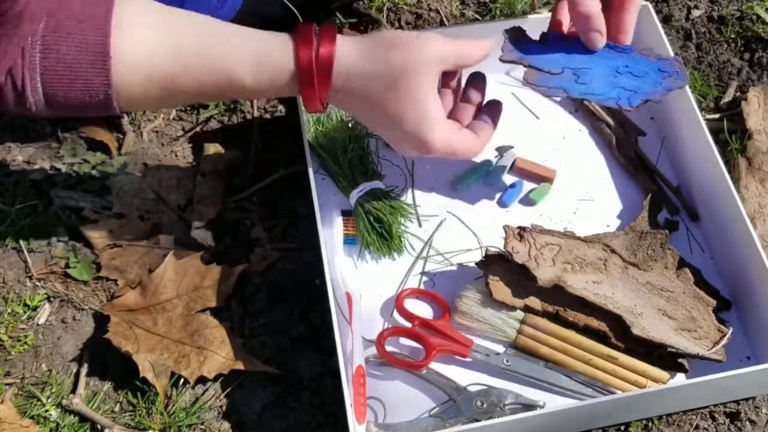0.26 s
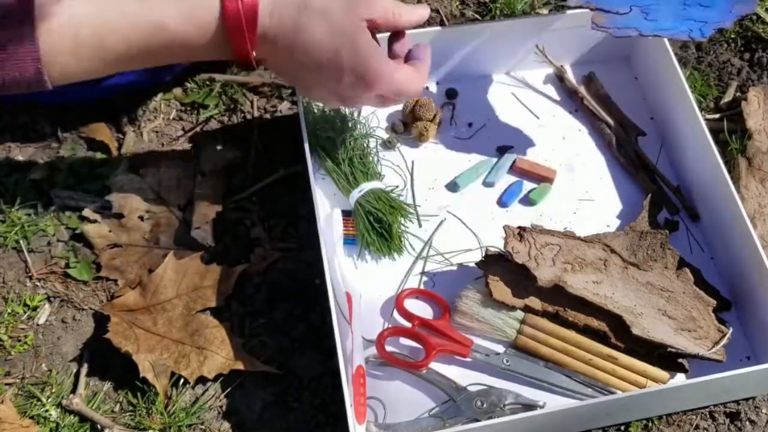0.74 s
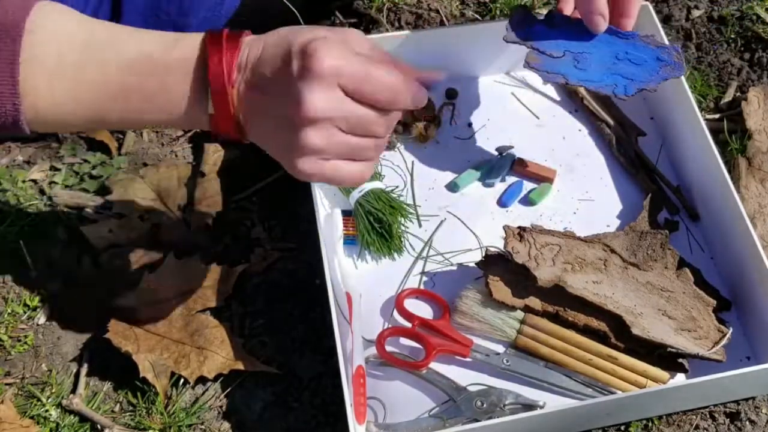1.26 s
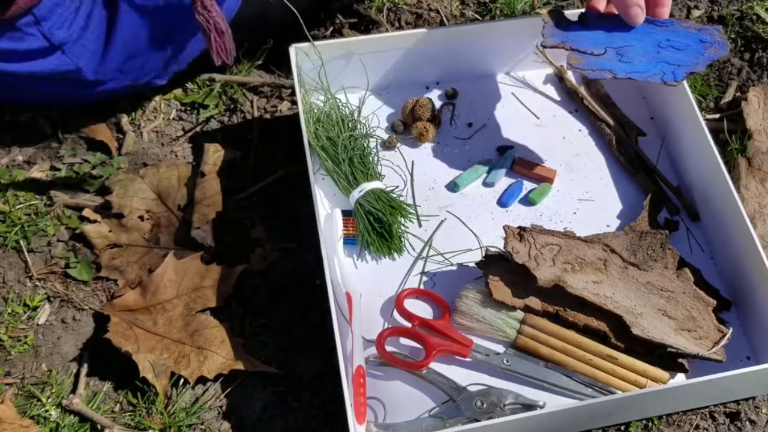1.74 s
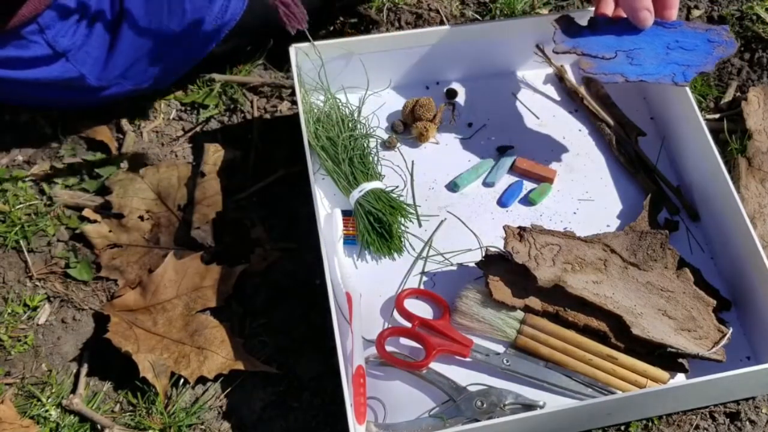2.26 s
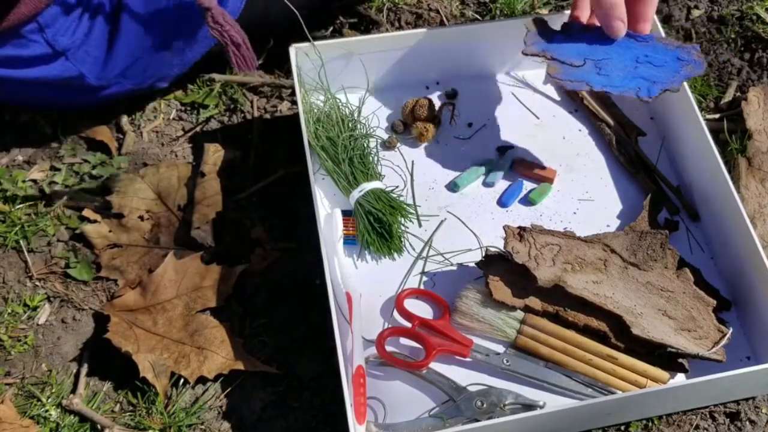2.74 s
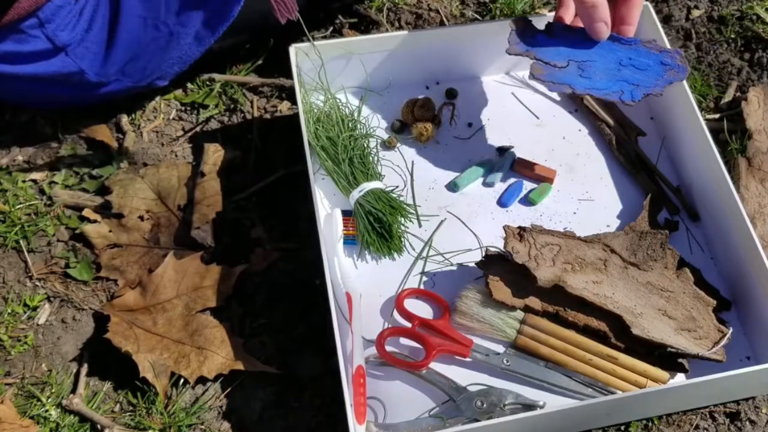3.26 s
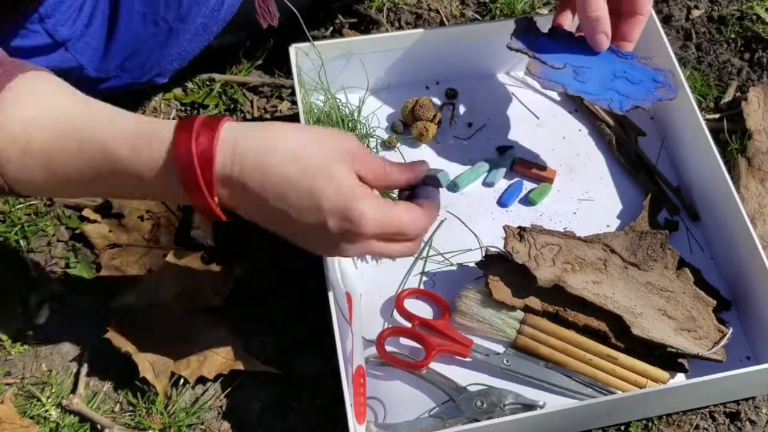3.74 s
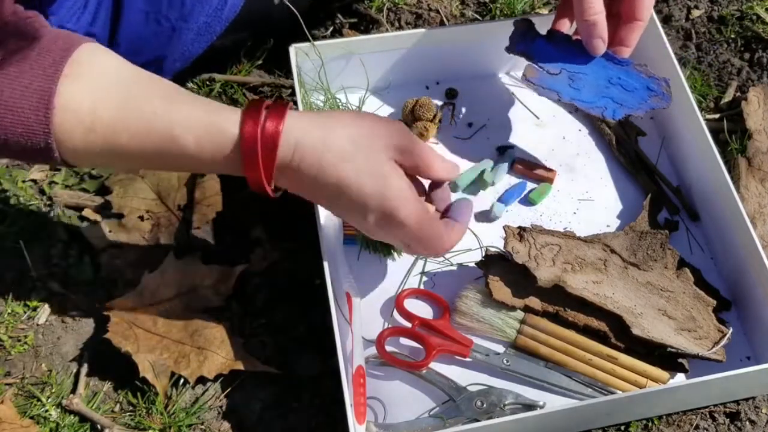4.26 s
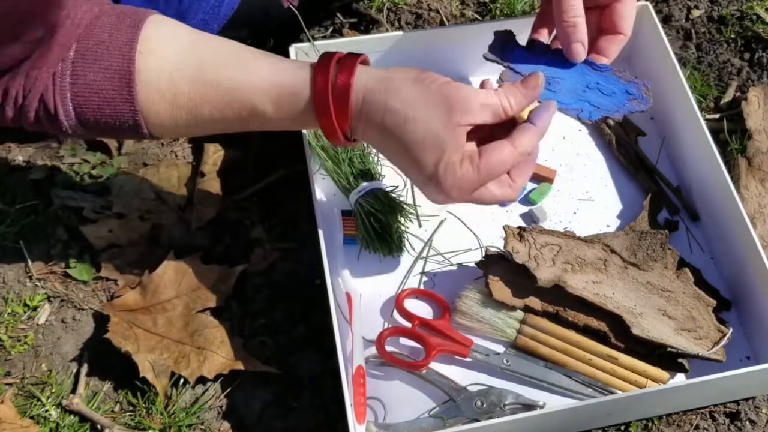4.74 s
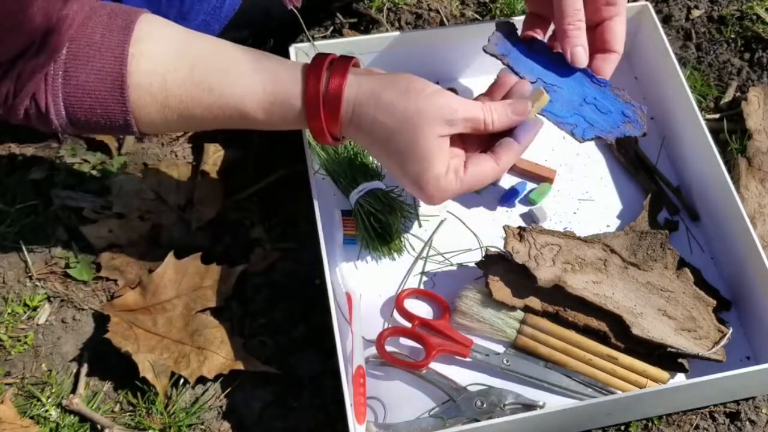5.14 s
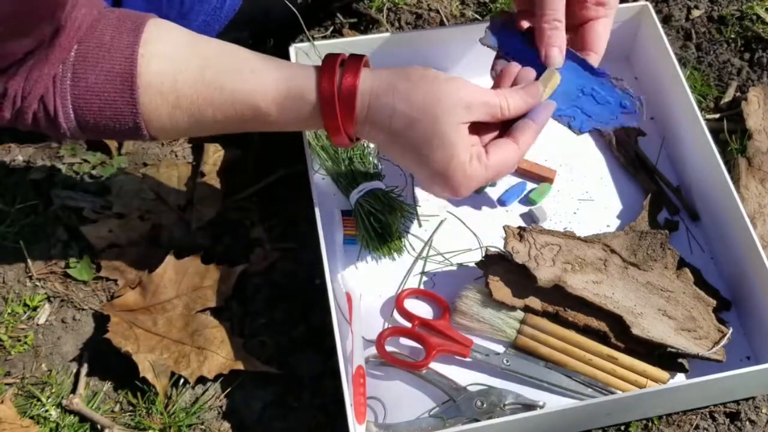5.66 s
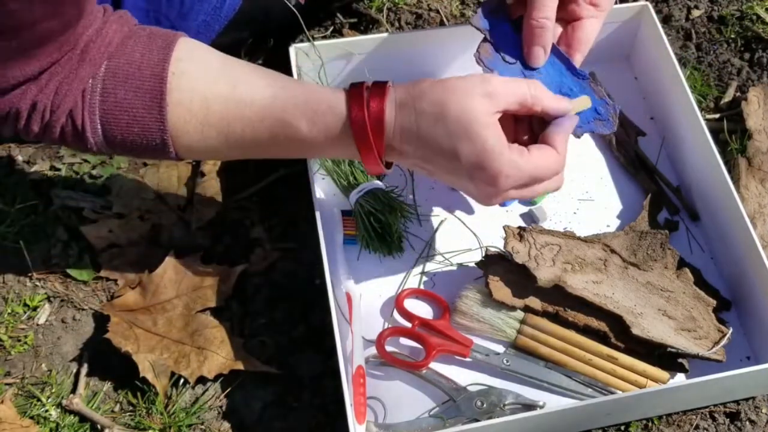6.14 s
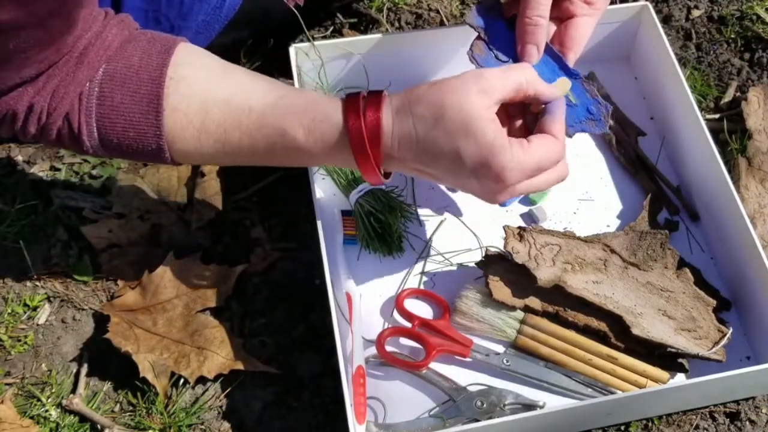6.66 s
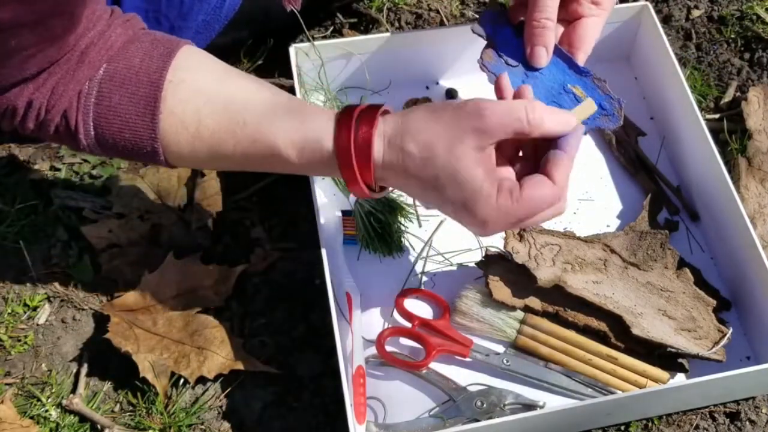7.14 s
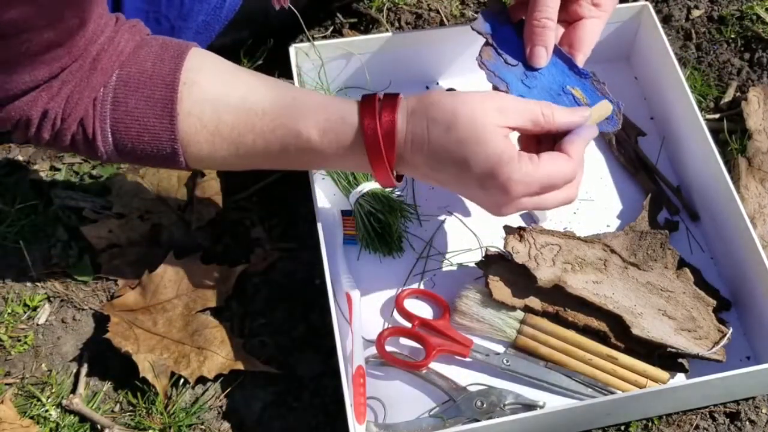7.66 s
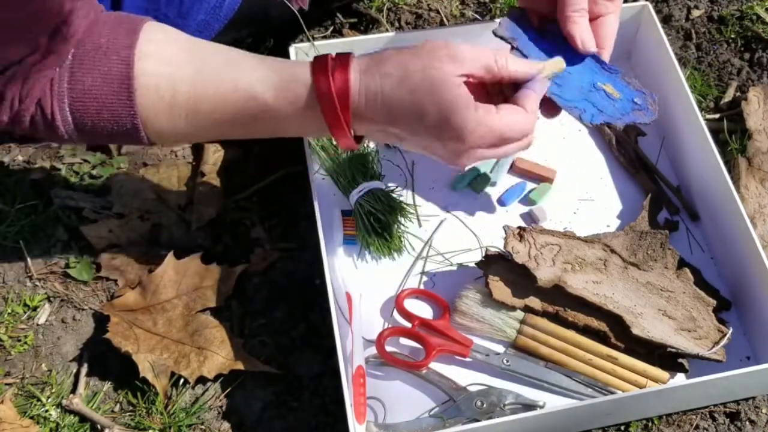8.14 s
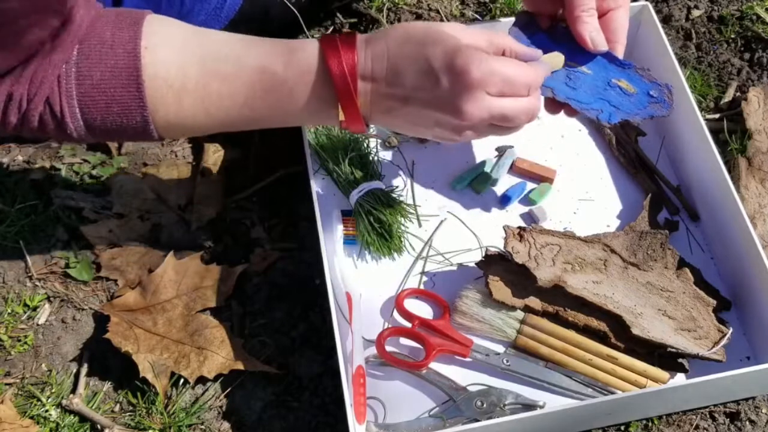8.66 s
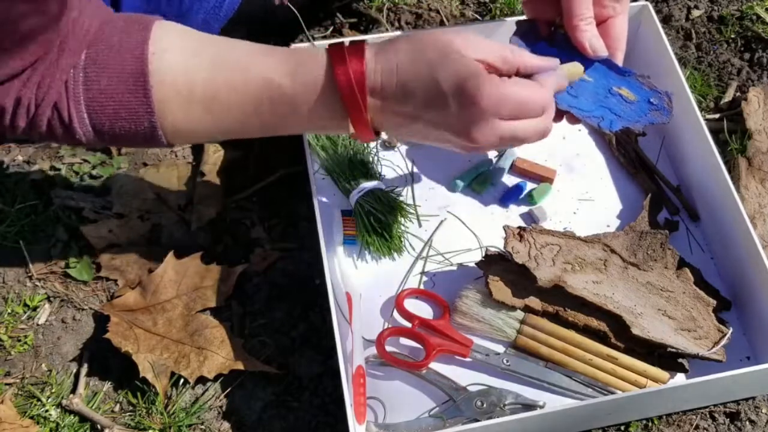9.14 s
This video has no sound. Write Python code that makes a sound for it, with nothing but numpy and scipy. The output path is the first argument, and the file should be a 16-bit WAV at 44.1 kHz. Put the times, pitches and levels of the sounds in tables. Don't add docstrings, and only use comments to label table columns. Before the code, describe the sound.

Very close stereo outdoors, leaning left. Two quick bright brushes over bark and a sharp flick with snapping flakes, then soft sleeve swishes. Bark crumbles with dry cracks and hollow knocks, then is shaken. Thin sticks clatter loudly into a card box and a thicker one drops. Later only faint chalk rubs, small bird notes and a short squeak, over distant traffic rumble and light hiss.

```python
import sys
import numpy as np
from scipy import signal
from scipy.fft import rfft, irfft
from scipy.io import wavfile
from scipy.ndimage import uniform_filter1d

SR = 44100
rng = np.random.default_rng(int(sys.argv[2]) if len(sys.argv) > 2 else 0)


def log_audio(samples):
    frames = np.atleast_2d(samples).T
    limited = np.clip(frames, -1, 1)
    pcm = np.round(limited * 32767).astype(np.int16)
    wavfile.write(sys.argv[1], SR, pcm)


def magnitude_from_level(level_db):
    exponent = np.asarray(level_db, float) / 20
    return 10 ** exponent


N = 414099

# (frequency [Hz], level per Hz [dB])
RUMBLE_COLOUR = [(24, -45), (40, -12.5), (59, -6.5), (134, -6), (193, -4), (221, -13), (262, -10),
                 (287, -26.5), (600, -44.5), (780, -62), (1320, -120)]
HISS_COLOUR = [(180, -32), (300, -7), (519, -19.5), (812, -19.5), (1090, -24), (1770, -23.5), (2860, -25),
               (4480, -23.5), (9610, -30.5), (15800, -40)]
# (frequency [Hz], likeness [0-1])
AIR_LIKENESS = [(60, 0.99), (240, .85), (500, 0.83), (950, 0.061), (15000, .02)]
# (frequency [Hz], left over right [dB])
AIR_BALANCE = [(60, 1.2), (950, 1.8), (15000, 0.55)]
# (time
# [s], level [dB])
TRAFFIC = [(0, -35.5), (.25, -37), (.4, -38.5), (1.4, -40.5), (2.4, -44.5), (4.1, -42), (4.2, -53),
           (4.35, -48), (5.0, -44.5), (5.65, -43), (7.8, -43), (9.39, -41.5)]
# (time [s], lift [dB])
RUSTLE = [
    (.2, 4.8),
    (2.08, 7.1),
    (3.25, 4.1),
]
# (time [s], level [dB])
DRONE = [(0, -33), (.4, -45), (1.5, -44.5), (1.8, -58.5), (3.2, -57), (3.899, -47), (4.2, -52),
         (9.39, -53.5)]

# (touch [s], peak [s], lift [s], peak level [dB], level at lift [dB])
BRUSH = [
    (0, .002, .034, -22.5, -35.5),
    (0.079, 0.168, 0.212, -17.5, -25),
]
FLICK = [
    (0.52, 0.566, .593, -24, -24.5),
]
CRUMBLE = [
    (1.817, 1.842, 1.864, -30, -29),
    (1.854, 1.96, 2.038, -27, -31.5),
    (2.04, 2.057, 2.088, -41.5, -47),
]
SHAKE = [
    (3.206, 3.224, 3.35, -52.5, -52.5),
    (3.269, 3.283, 3.291, -33, -37),
]
RATTLE = [
    (1.8, 1.844, 1.87, -30, -39.5),
    (1.871, 2.0, 2.13, -36, -50),
    (2.04, 2.054, 2.33, -48, -68),
    (3.133, 3.291, 3.45, -39.5, -55),
]
CHALK = [
    (1.7, 1.726, 1.765, -47, -53.5),
    (5.603, 5.637, 5.655, -58.5, -58),
    (9.332, 9.401, 9.4, -55.5, -51),
]
HARD_CHALK = [
    (2.945, 2.98, 2.995, -52.5, -57),
    (8.772, 8.805, 8.845, -39.5, -37),
]
DRAG = (8.38, 8.485, 8.59, -56, -66)

# (frequency [Hz], level [dB])
BRUSH_COLOUR = [(350, -69), (600, -33.5), (1070, -24.5), (1560, -35), (1840, -19), (2740, -10.5),
                (3280, -10), (3560, -9), (4250, -9), (7450, -5), (15800, -17.5)]
FLICK_COLOUR = [(600, -26), (1500, -25), (2100, -17.5), (2750, -24), (3400, -5.5), (5000, -9.5),
                (8000, -7.5), (15800, -14.5)]
CRUMBLE_COLOUR = [(700, -9.5), (1200, -1.5), (2000, -5.5), (3500, -4), (5000, -6), (8000, -12.5),
                  (15800, -21.5)]
SHAKE_COLOUR = [(710, -30), (1200, -6.5), (2010, -16), (3030, -24), (3380, -13.5), (4800, -12), (6740, -4),
                (10600, -8), (15800, -19.5)]
RATTLE_COLOUR = [(200, -38.5), (380, -7), (650, -5), (900, -8), (1400, -19.5), (2500, -27.5), (16000, -50)]
CHALK_COLOUR = [(1500, -21), (3300, -23.5), (8000, -18), (8800, -22.5), (13500, -18.5), (14500, -34),
                (16000, -40)]
RUB_COLOUR = [(800, -17), (2500, -2.5), (4000, -6.5), (5700, -8.5), (8000, -3), (12000, -19.5)]
SLEEVE_COLOUR = [(2940, -32), (5000, -35), (6640, -22), (7420, -13.5), (9000, -11.5), (11200, -1.5),
                 (12100, -3.5), (15800, 0)]
# (frequency [Hz], width [Hz], level [dB])
BRUSH_MODES = [(2170, 96, 1.9), (3600, 1200, 3.6), (5140, 440, 2)]
FLICK_MODES = [(2150, 350, 0), (3600, 540, 4), (5250, 279, 6), (6470, 230, -0.5), (8600, 1200, -0.5)]
CHALK_MODES = [(5177, 510, 16.5), (7160, 790, 14.5), (12270, 1500, 2)]
HARD_MODES = [(3900, 600, 28), (5650, 950, 34), (6950, 800, 28), (9400, 500, 12), (11900, 1800, 8)]
DRAG_MODES = [(3650, 300, 8), (5100, 500, 21), (6500, 600, 15)]
RUB_MODES = [(3880, 390, 4.5), (5700, 400, 3)]
# (frequency [Hz], left over right [dB])
BRUSH_SHADE = [(900, 6), (2200, 12), (3300, 1), (8000, 2), (13000, 4)]
CRUMBLE_SHADE = [(1000, 12), (2200, 13), (4000, 12), (6000, 16), (13000, 15)]
SHAKE_SHADE = [(1000, 16), (2500, 26), (5500, 32), (8000, 11), (13000, 15)]
HARD_SHADE = [(2200, 4), (3900, 27), (5500, 14), (8000, 13), (13000, 23)]
SLEEVE_SHADE = [(7000, 18), (9000, 10), (12000, 21)]
BOX_SHADE = [(1500, 9), (2500, 15), (3700, 13), (6000, 11), (8500, 7)]

# (time [s], level [dB])
SNAGS = [(1.841, -20.5), (1.85, -22), (1.861, -22), (1.887, -29), (1.91, -27.5), (1.921, -27.5),
         (1.945, -22.5), (1.965, -21.5), (1.996, -21.5), (2.026, -23.5), (2.036, -23.5), (3.251, -31.5)]
# (time [s], level [dB])
SLIPS = [(8.789, -39), (8.797, -32), (8.802, -44), (8.805, -28), (8.812, -27.5), (8.812, -27), (8.816, -24),
         (8.826, -29), (8.831, -33), (8.840, -38.5)]
# (time [s], peak level [dB], frequency [Hz], 60 dB decay [s])
FLAKES = [(0.5508, -8, 3620, .025), (0.5563, 0, 3600, 0.025), (.556, -23.5, 2150, 0.042),
          (.084, -39.5, 8600, 0.05), (.093, -30.5, 7500, .03), (.109, -33.5, 2060, 0.072),
          (.558, -21, 9700, 0.028), (1.056, -37, 7080, 0.046), (0.559, -16, 5250, .02),
          (.558, -17, 6670, 0.024), (.571, -15, 3600, 0.028), (1.823, -27.5, 3550, 0.034),
          (1.824, -25, 5100, .03), (1.826, -31, 6490, 0.028), (1.837, -19, 3500, 0.034),
          (1.84, -21.5, 7800, .02), (3.183, -49, 7750, 0.016), (3.198, -31, 7350, 0.013),
          (3.212, -25, 8600, .012), (3.213, -36, 5740, 0.013), (3.219, -24, 7280, .012),
          (3.2256, -6.5, 7260, 0.005), (3.244, -18, 7700, .012), (3.249, -23.5, 5800, 0.0084),
          (3.319, -21, 4653, 0.0095), (8.786, -37.5, 7070, 0.041), (8.83, -34.5, 6850, 0.047),
          (8.838, -28, 6950, 0.052)]
CRACKS = [(1.8595, -14.5, 2290, 0.0026), (1.8599, -3.5, 940, 0.008), (1.9095, -22, 3394, .004),
          (1.9205, -20, 4700, .004), (1.9455, -18, 2600, .004), (1.9645, -11, 2190, .004),
          (1.9655, -18, 8480, .005), (1.995, -23.5, 3010, .004), (2.0256, -17, 2780, .004),
          (2.0368, -14.5, 3150, 0.0027), (2.066, -20.5, 2190, 0.006), (2.085, -30, 4500, .004),
          (3.2258, -17, 4160, 0.0013), (3.251, -22, 1796, 0.0044), (3.2876, -9.5, 1950, 0.0036)]
RINGS = [(4.118, -17, 3090, 0.021), (4.125, -14.5, 2990, .02), (4.1325, -8, 2300, 0.028),
         (4.1325, -10, 5160, .02), (4.133, -15, 7400, 0.021), (4.252, -24, 2280, 0.026),
         (4.251, -24, 3670, .025), (4.259, -32.5, 5170, 0.022), (4.26, -24, 3500, 0.018),
         (4.166, -24, 2960, 0.017), (4.265, -50.5, 5230, .2), (4.132, -12, 4400, 0.023),
         (4.4882, -21, 3095, 0.02), (4.4896, -36.5, 3880, 0.019), (4.506, -41, 3160, .04),
         (4.517, -49, 3240, 0.047), (4.599, -54, 3700, 0.029)]
# (time [s], level [dB], frequency [Hz], width [Hz], 60 dB decay [s])
FAR_KNOCKS = [
    (.72, -47.5, 906, 500, 0.59),
    (2.895, -46, 1930, 250, 0.17),
    (2.905, -48, 2250, 450, 0.91),
    (2.91, -52.5, 3540, 500, 0.75),
    (3.64, -50.5, 2427, 600, 0.11),
]
# (time [s], level [dB])
RUBS = [(6.15, -62.5), (6.25, -70), (6.345, -59), (6.44, -66), (6.529, -60), (6.65, -58), (6.745, -57),
        (6.86, -54.5), (6.99, -60), (0.749, -54.5)]
# (time [s], level [dB], relative length)
SLEEVE = [(.9, -65, 0.72), (1.029, -74, 0.68), (1.061, -73.5, .9), (1.143, -80, 0.7), (1.213, -64, 0.7),
          (1.44, -79, 1.4), (4.468, -84, 0.4)]
# (time [s], peak level [dB], frequency
# [Hz])
KNOCKS = [(1.789, -20.5, 750), (1.825, -15, 800), (1.842, -13.5, 840), (1.859, -15.5, 387),
          (1.887, -29, 684), (1.914, -19.5, 810), (1.945, -23, 660), (1.964, -11, 1120),
          (1.992, -15.5, 730), (2.025, -11.5, 680), (2.035, -17, 710), (2.066, -13.5, 846),
          (2.083, -23.5, 664), (2.153, -23, 595), (2.175, -30, 830), (2.24, -39, 850), (2.289, -43.5, 963),
          (2.969, -41.5, 791), (3.151, -22, 683), (3.198, -32, 720), (3.225, -18, 610), (3.249, -15.5, 700),
          (3.263, -12.5, 590), (3.271, -12.5, 570), (3.283, -15, 653), (3.291, -16.5, 583),
          (3.328, -18, 656), (3.346, -16.5, 595), (3.391, -28, 705), (3.407, -26.5, 642),
          (2.138, -36.5, 526), (3.208, -28, 676), (3.235, -28, 600), (3.255, -31, 518), (3.308, -27.5, 692),
          (3.338, -25, 695), (1.832, -18.5, 720), (1.848, -17.5, 806), (1.845, -23.5, 1510),
          (1.85, -24, 1600), (1.937, -27.5, 750), (1.948, -25, 990), (1.966, -17.5, 590), (1.977, -26, 754),
          (1.985, -29.5, 670), (1.997, -19.5, 520), (2.008, -24, 800), (2.016, -23, 695),
          (2.03, -18.5, 464), (2.07, -19, 880), (2.139, -42, 1500), (2.241, -42, 1400), (2.289, -43, 1336),
          (2.331, -50, 895)]
# (time [s], peak level [dB], frequency [Hz], tick level [dB])
THUMP = (2.158, -26, 110, -80)
# (time [s], peak level
# [dB], brightness [dB], strongest frequency [Hz])
TAPS = [(1.86, -17, -18.5, 1120), (2.153, -25.5, -38, 1630), (4.112, -36, -7, 2300), (4.115, -26, -6, 2280),
        (4.119, -9.5, 1, 1450), (4.124, -6, -7.5, 1000), (4.132, -2, 2, 3600), (4.133, -4, -5.5, 2290),
        (4.137, -8, -2, 3600), (4.139, -9.5, -11.5, 934), (4.167, -20, -7, 956),
        (4.1673, -25.5, -8.5, 3030), (4.178, -20.5, -20.5, 1020), (4.194, -27, -31, 1140),
        (4.208, -29, -16, 873), (4.252, -12.5, -16.5, 1090), (4.2516, -29, -14.5, 2310),
        (4.26, -16.5, -21.5, 3320), (4.261, -31.5, -11, 5180), (4.37, -49, -26, 912),
        (4.408, -40.5, -19, 1084), (4.598, -48, -12, 1037), (7.019, -51.5, 4, 5530),
        (8.006, -47, -8.5, 1307), (8.006, -45, 0, 3570), (8.29, -47, -8, 993), (9.256, -45, -3.5, 1080)]
DROPS = [
    (4.489, -14.5, -16, 1460),
    (4.506, -31.5, -19, 1450),
    (4.522, -34.5, -24, 1400),
]
# (frequency [Hz], level [dB])
BOX_MODES = [(790, -4.5), (1000, -5), (1290, -5), (1560, -10), (1830, -1), (2290, 1), (3030, 1.5),
             (3200, -3.5), (3600, 2), (4300, -2), (5200, -2.5)]
STICK_MODES = [(620, 0.5), (1250, -3.5), (1500, 0), (1795, -3), (2150, -1), (3060, 2), (3250, -2),
               (3850, -5), (4900, -9)]
# (start [s], length [s], from [Hz], to [Hz], level [dB])
PEEPS = [
    (7.874, 0.039, 10980, 11380, -51.5),
    (7.944, 0.027, 4520, 4600, -61),
    (7.956, 0.14, 4603, 5250, -42),
    (8.058, 0.06, 6430, 8050, -43.5),
    (8.183, .022, 7180, 7230, -49.5),
    (8.202, 0.049, 8090, 8140, -47.5),
]
RASPS = [
    (5.622, 0.11, 6950, 6790, -49.5),
    (5.664, 0.046, 7700, 7670, -62),
    (5.713, 0.069, 7540, 7140, -46.5),
    (5.729, 0.045, 6530, 6400, -54),
]

HISS_DB, HISS_FOLLOWS, USUAL_DB, RUSTLE_S = -59.5, 0.75, -43, 0.19
DRONE_HZ, DRONE_WIDTH_HZ = 136.23, 10
LEAN_IN_DB, LIFT_DB, LIFT_S, TRAIL_DB_PER_S, TRAIL_S = 36, 5.5, 0.0028, 427, 0.07
TRAIL_DULL, LEAN_BRIGHT = 0.36, 0.1
SNAG_DB_PER_S, SLIP_DB_PER_S, SNAG_DULL = 4001, 6000, 0.5
SWISH_IN_S, SWISH_OUT_S, SWISH_DB = 0.047, 0.11, 21
RUB_S = 0.047
TICK_OVER_GRIT_DB, SOFT_TICK_DB = 3.5, -54.5
RING_S, RING_SLOPE, PAN_DB, PAN_DB_PER_OCTAVE = 0.03, -0.14, 6.5, 4.5
NOTE_ATTACK, NOTE_START_DB, NOTE_FADE_DB, FADE_SHAPE, CLIMB_HOLD, BEND = 0.11, -5, -27, 0.37, 0.26, 1.2


def evened(x):
    return x / np.sqrt(np.mean(x ** 2) + 1e-20)


def read(points, hz):
    f, value = np.transpose(points)
    return np.interp(np.log(hz + 1), np.log(f + 1), value)


def add(mix, s, sound):
    part = mix[:, max(round(s * SR), 0):][:, :sound.shape[1]]
    part += sound[:, :part.shape[1]]


def ports(near, other, pan_db, same, delay):
    same = np.clip(same, 0, 1)
    right = same * np.roll(near, delay) + np.sqrt(1 - same ** 2) * other
    return np.array([near * magnitude_from_level(pan_db / 2), right * magnitude_from_level(-pan_db / 2)])


def shade(pair, balance):
    balance_db = read(balance, np.fft.rfftfreq(pair.shape[1], 1 / SR))
    return irfft(rfft(pair) * magnitude_from_level(balance_db * np.array([[0.5], [-0.5]])), pair.shape[1])


def resonate(x, hz, width):
    turn = np.exp(2j * np.pi * np.cumsum(hz * np.ones(x.shape[-1])) / SR)
    r = np.exp(-np.pi * width / SR)
    return 2 * (turn * signal.lfilter([1 - r], [1, -r], x / turn + 1e-18)).real


def air():
    frames, hz, t = N // 256 + 5, np.fft.rfftfreq(1024, 1 / SR), np.arange(N) / SR
    same = np.clip(read(AIR_LIKENESS, hz), -1, 1)[:, None]
    balance_db = read(AIR_BALANCE, hz)[:, None] * np.array([0.5, -0.5])[:, None, None]
    rumble_db = np.interp(t, *np.transpose(TRAFFIC))
    rustle_db = sum(db * np.exp(-((t - s) / RUSTLE_S) ** 2) for s, db in RUSTLE)
    hiss_db = HISS_DB + HISS_FOLLOWS * (rumble_db - USUAL_DB) + rustle_db
    out = 0
    for colour, level_db, patchy_db in ((RUMBLE_COLOUR, rumble_db, 1.2), (HISS_COLOUR, hiss_db, 0.8)):
        a, b, c, d, patches = rng.standard_normal((frames, 513, 5)).T
        patches = uniform_filter1d(uniform_filter1d(patches, size=14, axis=0), size=12, axis=1)
        left = a + 1j * b
        z = np.array([left, same * left + np.sqrt(1 - same ** 2) * (c + 1j * d)])
        z *= magnitude_from_level(read(colour, hz)[:, None] + patchy_db * evened(patches) + balance_db)
        out = out + evened(signal.istft(z, nperseg=1024, noverlap=768)[1][:, :N]) * magnitude_from_level(level_db)
    return np.array([out[0], np.roll(out[1], 17)])


def drone():
    hum = resonate(rng.standard_normal(N), DRONE_HZ, DRONE_WIDTH_HZ)
    hum = evened(resonate(hum, DRONE_HZ, DRONE_WIDTH_HZ))
    return hum * magnitude_from_level(np.interp(np.arange(N) / SR, *np.transpose(DRONE)))


def grit(size, colour, modes, coarse_db, split_hz=8000):
    sizes = np.minimum(rng.exponential(1, (size + 1024, 1)), 4)
    grains = rng.standard_normal((size + 1024, 2)) * magnitude_from_level(coarse_db * sizes)
    hz = np.fft.rfftfreq(size + 1024, 1 / SR)
    peaks = sum(magnitude_from_level(db) / (1 + (2 * (hz - f) / w) ** 2) ** 2 for f, w, db in modes)
    spectrum = rfft(grains.T) * magnitude_from_level(read(colour, hz)) * (1 + peaks)
    bright = np.clip((hz - split_hz) / 1000 + 0.5, 0, 1)
    return [evened(irfft(spectrum * part, size + 1024)[:, :size]) for part in (1 - bright, bright)]


def gesture(touch, peak, lift, peak_db, lift_db, bright_db, tilt=0, snags=(), lean_db=LEAN_IN_DB,
            drop_db=LIFT_DB, dulls=TRAIL_DULL, airy=LEAN_BRIGHT, snag_db_per_s=SNAG_DB_PER_S):
    s = np.arange(touch, lift + TRAIL_S, 0.0005)
    lean = lean_db * np.clip((peak - s) / (peak - touch), 0, 1) ** 2
    trail = drop_db * np.clip((s - lift) / LIFT_S, 0, 1) + TRAIL_DB_PER_S * np.maximum(s - lift, 0)
    even = np.interp(s, [peak, lift], [peak_db, lift_db]) - lean - trail
    catches = [db - snag_db_per_s * abs(s - at) for at, db in snags if touch < at < lift]
    caught = np.max([even] + catches, axis=0)
    brightness = bright_db + tilt * (peak_db + 33.5) - SNAG_DULL * (caught - even)
    return np.transpose([s, caught, brightness - dulls * trail + airy * lean])


def stroke(path, colour, modes, coarse_db, lumpy_db, pan_db, same, delay, split_hz=8000):
    s, pressure_db, bright_db = np.transpose(path)
    t = np.arange(s[0], s[-1], 1 / SR)
    dull, bright = grit(len(t), colour, modes, coarse_db, split_hz)
    ridges = uniform_filter1d(uniform_filter1d(rng.standard_normal(8000), size=90), size=90)
    ridges = np.resize(evened(ridges)[:len(t)], len(t))
    sound = dull + bright * magnitude_from_level(np.interp(t, s, bright_db))
    sound = sound * magnitude_from_level(np.interp(t, s, pressure_db) + lumpy_db * ridges)
    z = signal.stft(sound, nperseg=128)[2]
    patches = uniform_filter1d(rng.standard_normal(z.shape[1:]), size=5, axis=0)
    patches = evened(uniform_filter1d(patches, size=7, axis=1))
    sound = signal.istft(z * magnitude_from_level(lumpy_db * 1.7 * patches), nperseg=128)[1][:, :len(t)]
    sound *= signal.windows.tukey(len(t), 40 / len(t))
    if np.ndim(pan_db):
        return s[0], shade(ports(*sound, 0, same, delay), pan_db)
    return s[0], ports(*sound, pan_db, same, delay)


def brush(row):
    path = gesture(*row, -2.2, drop_db=8.5, dulls=0.15, airy=0.16)
    return stroke(path, BRUSH_COLOUR, BRUSH_MODES, 1.1, 1.0, BRUSH_SHADE, 0.45, 0, split_hz=7600)


def flake(s, db, hz, t60):
    t = np.arange(2000) / SR
    width = np.clip(16 / t60, 700, 3500)
    rough = rng.standard_normal(2000)
    for _ in range(3):
        rough = resonate(rough, hz, width)
    ring = (np.sin(2 * np.pi * hz * t) + 0.4 * evened(rough)) * np.minimum((t[-1] - t) / 0.02, 1)
    sound = ring * magnitude_from_level(db - 60 * t / t60) * (1 - np.exp(-t / (0.03 * t60))) ** 2 * 1.1
    if s < 1.5:
        balance = BRUSH_SHADE
    elif s < 3:
        balance = CRUMBLE_SHADE
    elif s < 4:
        balance = SHAKE_SHADE
    else:
        balance = BOX_SHADE if s < 5 else HARD_SHADE
    pan_db = read(balance, hz)
    near = 2 / (magnitude_from_level(pan_db / 2) + magnitude_from_level(-pan_db / 2)) * sound
    return s, ports(near, near, pan_db, 0.9, 4)


def flick(row):
    path = gesture(*row, -3.5, 0, SNAGS, lean_db=50, drop_db=12.5, dulls=0.044, airy=0.0)
    return stroke(path, FLICK_COLOUR, FLICK_MODES, 1.1, 1.0, BRUSH_SHADE, 0.73, 0)


def far_knock(s, db, hz, width, t60):
    t = np.arange(20000) / SR
    puff = evened(resonate(resonate(rng.standard_normal((2, 20000)), hz, width), hz, width))
    return s, ports(*(puff * magnitude_from_level(db - 60 * t / t60) * (1 - np.exp(-t / 0.0047))), 5.0, 0.41, 6)


def rub(s, db):
    dull, bright = grit(round(1.27 * RUB_S * SR), RUB_COLOUR, RUB_MODES, 2.4)
    sound = (dull + 0.32 * bright) * np.hanning(dull.shape[1]) * magnitude_from_level(db)
    return s - 0.65 * RUB_S, ports(*sound, 3.5, 0.6, 8)


def swish(s, db, long):
    touch, lift = s - long * SWISH_IN_S, s + long * SWISH_OUT_S
    path = gesture(touch, s, lift, db, db - SWISH_DB, 20, lean_db=26.5)
    return stroke(path, SLEEVE_COLOUR, [], 2.0, 1.9, SLEEVE_SHADE, 0.5, 4)


def chalk(row):
    return stroke(gesture(*row, -20), CHALK_COLOUR, CHALK_MODES, 2.0, 1.5, 19.5, 0.54, 8)


def knock(s, db, hz, tick_db):
    chance, t = rng.standard_normal(3000), np.arange(3000) / SR
    swell = (t * hz / 1.31) ** 2 * np.exp(2 - 2 * t * hz / 1.352)
    overtone = 0.066 * np.cos(2 * np.pi * (1.71 * hz * t + chance[1]))
    swing = swell * (np.cos(2 * np.pi * (hz * t + chance[0])) + overtone)
    tick = resonate(chance, 3000, 6000) * np.exp(-abs(t - 0.0016) / 0.00025)
    tick = tick / abs(tick).max() * magnitude_from_level(np.minimum(tick_db + 8.0, db - 9.0))
    sound = swing * magnitude_from_level(db) + tick
    return s - 0.0005, ports(sound, np.roll(sound, 30), 6.2 + 1.0 * chance[2], 0.98, 8)


def bark_knock(s, db, hz, paths):
    grit_db = max(np.interp(s, p[:, 0], p[:, 1] + np.maximum(p[:, 2], 0), -99, -99) for p in paths)
    return knock(s, db, hz, max(grit_db + TICK_OVER_GRIT_DB, SOFT_TICK_DB))


def rattle(row):
    return stroke(gesture(*row, -40.5), RATTLE_COLOUR, [], 3.5, 1.8, 10.0, 0.8, 8)


def crumble(path):
    return stroke(path, CRUMBLE_COLOUR, [], 3.0, 1.5, CRUMBLE_SHADE, 0.21, 8)


def tap(s, db, bright_db, peak_hz, mode_table):
    chance, t = rng.standard_normal((2, 8000)), np.arange(8000) / SR
    octaves = np.log2(peak_hz / 1000)
    pan_db = PAN_DB + PAN_DB_PER_OCTAVE * octaves
    ring_s = RING_S * (peak_hz / 1000) ** RING_SLOPE
    hz, mode_db = np.transpose(mode_table)[:, :, None]
    tilt_db = bright_db * np.clip(np.log2(hz / 1500), 0, 1)
    tilt_db = tilt_db + 14 / (1 + (np.log2(hz / peak_hz) / 0.28) ** 2)
    spread = np.clip(chance[0, :len(mode_table), None], -1, 1)
    swings = np.sin(2 * np.pi * hz * (1 + 0.025 * spread[::-1]) * t + 3 * spread)
    modes = (magnitude_from_level(mode_db + tilt_db + 2 * spread) * swings).sum(0)
    scuff = resonate(resonate(chance, peak_hz, 1800), peak_hz, 1800)
    scuff = evened(scuff + magnitude_from_level(-abs(bright_db) - 4.0) * resonate(chance[::-1], 4700, 4900))
    body = evened(modes) * (peak_hz < 4000) + 0.55 * scuff
    body = body * magnitude_from_level(-60 * t / ring_s) * (1 - np.exp(-t / 0.0007))
    body /= abs(body).max()
    bins = np.fft.rfftfreq(8000, 1 / SR)
    rings = (magnitude_from_level(mode_db + tilt_db * 0.47) / (1 + (2 * (bins - hz) / 450) ** 2)).sum(0)
    trailing = (evened(irfft(rfft(chance) * rings)) + 0.6 * scuff)[:, ::-1]
    trailing = trailing * magnitude_from_level(-32.5 - 60 * t / 0.19) * np.clip((t[-1] - t) / 0.035, 0, 1)
    edge_hz = np.clip(11000 * 2 ** (bright_db / 9), 2000, 18000)
    band = signal.butter(3, [300, edge_hz], "bandpass", fs=SR, output="sos")
    sound = signal.sosfilt(band, body + trailing)
    return s - 0.0005, ports(*(magnitude_from_level(db) * sound), pan_db, 1.0, 2)


def hard_chalk(row):
    path = gesture(*row, -18.5, 0, SLIPS, drop_db=14, snag_db_per_s=SLIP_DB_PER_S)
    return stroke(path, CHALK_COLOUR, HARD_MODES, 0.99, 0.93, HARD_SHADE, 0.44, 8)


def shake(path):
    return stroke(path, SHAKE_COLOUR, [], 3.4, 1.5, SHAKE_SHADE, 0.18, 9, split_hz=2800)


def note(start, length, from_hz, to_hz, db):
    s = np.arange(0, length, 0.001)
    shape = FADE_SHAPE + CLIMB_HOLD * (np.log2(to_hz / from_hz) / length) ** 2
    rise = NOTE_START_DB * np.clip(1 - s / length / NOTE_ATTACK, 0, 1)
    fade = NOTE_FADE_DB * np.clip((s / length - NOTE_ATTACK) / (1 - NOTE_ATTACK), 0, 1) ** shape
    pitch = from_hz + (to_hz - from_hz) * (s / length) ** BEND
    return np.transpose([start + s, pitch, db + rise + fade])


def peep(path, fuzz=0.55, echo_db=-4.0, wide=1.0):
    s, hz, db = np.transpose(path)
    t = np.arange(s[0], s[-1], 1 / SR)
    pitch = np.interp(t, s, hz)
    clean = np.sqrt(2) * np.cos(2 * np.pi * np.cumsum(pitch) / SR)
    breath = rng.standard_normal(8000)[:len(t)]
    for width in (250, 350, 500):
        breath = resonate(breath, pitch, width * wide)
    level = uniform_filter1d(magnitude_from_level(np.interp(t, s, db)), size=260) * signal.windows.tukey(len(t), 0.2)
    fuzz = np.clip(fuzz * np.linspace(0.5, 1.9, len(t)), 0, 1)
    whistle = ((1 - fuzz) * clean + fuzz * evened(breath)) * level
    tail = rng.standard_normal((2, 5000)) * magnitude_from_level(-60 * np.arange(5000) / SR / 0.21)
    wet = signal.fftconvolve(whistle[None], tail / np.linalg.norm(tail[0]), axes=1)
    wet = wet * magnitude_from_level([[echo_db + 8.0], [echo_db - 16]])
    add(wet, 0, ports(whistle, whistle, 30.0, 1.0, 0))
    return s[0], wet


def rasp(row):
    return peep(note(*row), fuzz=0.86, echo_db=-9.0, wide=1.6)


def drag():
    path = gesture(*DRAG, -23, lean_db=22)
    return stroke(path, CHALK_COLOUR, DRAG_MODES, 1.45, 1.2, 5.5, 0.5, 8)


def scene():
    mix = air() + drone()
    crumble_paths = [gesture(*row, -14.5, 0.71, SNAGS) for row in CRUMBLE]
    shake_paths = [gesture(*row, 7.8, -0.074, SNAGS) for row in SHAKE]
    for source, rows in ((brush, BRUSH), (flick, FLICK), (crumble, crumble_paths), (shake, shake_paths),
                         (rattle, RATTLE), (chalk, CHALK), (hard_chalk, HARD_CHALK), (rasp, RASPS)):
        for row in rows:
            add(mix, *source(row))
    for source, rows in ((flake, [*FLAKES, *CRACKS, *RINGS]), (far_knock, FAR_KNOCKS), (rub, RUBS),
                         (swish, SLEEVE), (knock, [THUMP])):
        for row in rows:
            add(mix, *source(*row))
    for row in KNOCKS:
        add(mix, *bark_knock(*row, crumble_paths + shake_paths))
    for blows, modes in ((TAPS, BOX_MODES), (DROPS, STICK_MODES)):
        for row in blows:
            add(mix, *tap(*row, modes))
    for row in PEEPS:
        add(mix, *peep(note(*row)))
    add(mix, *drag())
    return mix


def roll_off(x):
    return signal.sosfilt(signal.butter(12, 15960, fs=SR, output="sos"), x)


def record(dry):
    cut = signal.sosfilt(signal.butter(8, 48, "highpass", fs=SR, output="sos"), dry)
    edge = signal.firwin(301, 15950, window=("kaiser", 8), fs=SR)
    mix = signal.oaconvolve(np.clip(cut, -1, 1), edge[None], "same")
    return roll_off(mix)


dry = scene()
out = record(dry)
log_audio(out)
```